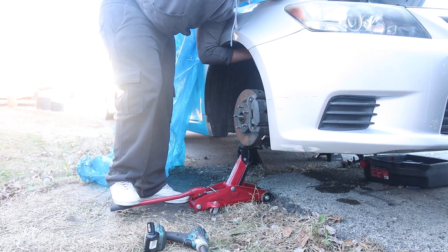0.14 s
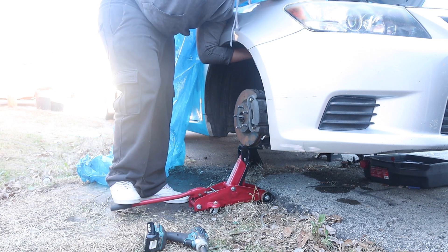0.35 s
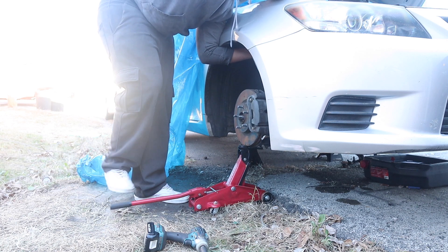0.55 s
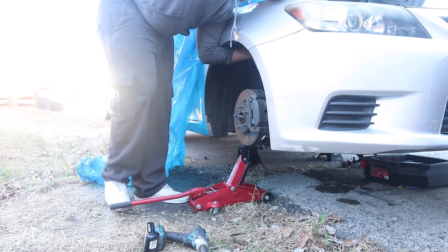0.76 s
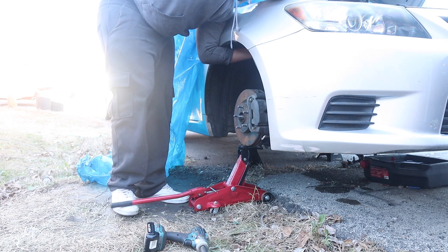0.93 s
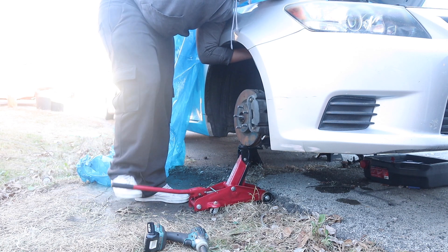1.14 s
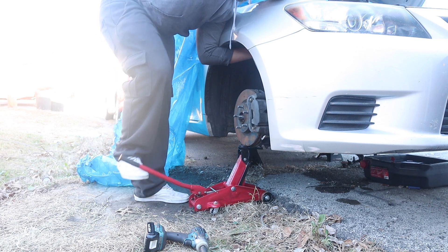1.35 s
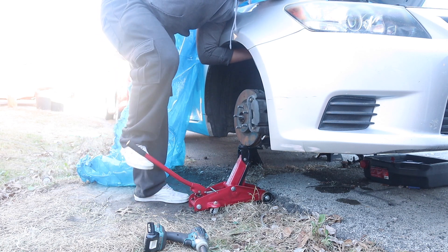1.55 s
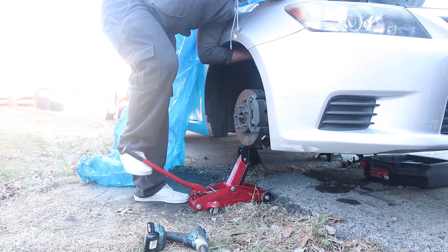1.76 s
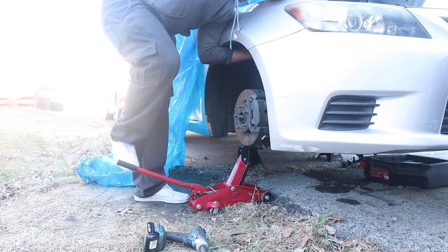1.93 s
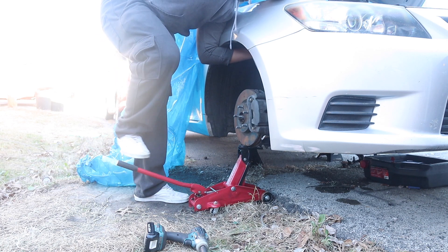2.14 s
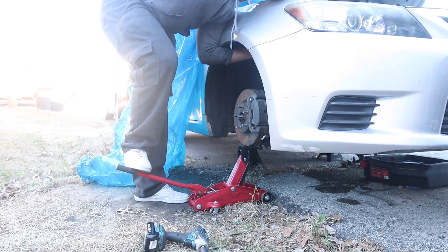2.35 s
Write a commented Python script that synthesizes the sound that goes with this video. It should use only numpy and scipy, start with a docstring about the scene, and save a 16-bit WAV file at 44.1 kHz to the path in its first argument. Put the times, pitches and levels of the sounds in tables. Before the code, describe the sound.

Floor jack worked by foot beside a car: hollow thump, steel clinks, dull knocks, gritty scuffs

```python
"""Floor jack on gravel

A jack is worked by foot beside a car, to the left: struck modes give the body's one hollow thump, the steel
handle's clinks and the shoe's dull knocks; decaying noise bands rustle, and random impulses make grit scuff.
Behind them, wavering narrow-band tones are faint birds, and shaped noise is far traffic and recorder hiss."""
import sys
import numpy as np
from scipy import signal
from scipy.io import wavfile

SR = 44100
rng = np.random.default_rng(int(sys.argv[2]) if len(sys.argv) > 2 else 0)


def dump_mix(stems):
    """Bounce the given channels to the path in sys.argv[1] as a 16-bit WAV at rate SR."""
    frames = np.atleast_2d(stems).T  # one column per channel
    limited = np.clip(frames, -1, 1)  # hard clip at full scale
    pcm = np.round(limited * 32767).astype(np.int16)
    wavfile.write(sys.argv[1], SR, pcm)


N = 110250


def amp(db):
    """Decibel law: level in dB to amplitude gain."""
    return 10 ** (np.asarray(db) / 20)


def rms_one(x):
    """Normalisation: scale to an rms of 1."""
    return x / np.sqrt(np.mean(x ** 2) + 1e-20)


def at_hz(points, hz, column=1):
    """Spectral interpolation: read a table column on a log-frequency axis."""
    points = np.array(points)
    return np.interp(np.log(hz), np.log(points[:, 0]), points[:, column])


def drift(rate_hz):
    """Low-passed random fluctuation: two equal poles at rate_hz, computed every 40 samples, near rms 1."""
    r = np.exp(-2 * np.pi * rate_hz * 40 / SR)
    white = rng.standard_normal(N // 40 + 2002)
    slow = signal.lfilter([1], [1, -2 * r, r * r], white)[2000:]  # skip the filter's start
    return np.interp(np.arange(N) / 40, np.arange(len(slow)), rms_one(slow))


def band(x, low_hz, high_hz):
    """Band-pass filtering with Butterworth slopes."""
    edges = [low_hz, min(high_hz, .45 * SR)]
    return signal.sosfilt(signal.butter(2, edges, "band", fs=SR, output="sos"), x)


def bands():
    """Third-octave analysis: band edges [Hz] from 22 Hz up."""
    edges = 22 * 2 ** (np.arange(30) / 3)
    return list(zip(edges, edges[1:]))


def ring(clicks, hz, t60):
    """Damped resonance: a unit click starts a decaying sine of initial height 1."""
    r = amp(-60 / (t60 * SR))
    w = 2 * np.pi * hz / SR
    return signal.lfilter([0, np.sin(w)], [1, -2 * r * np.cos(w), r * r], clicks + 1e-18)


def add(out, s, sound):
    """Superposition: mix a sound in at time s [s], trimmed to the scene."""
    i = int(s * SR)
    part = sound[max(-i, 0):N - i]
    out[max(i, 0):max(i, 0) + len(part)] += part


# quick run of contacts in the jolt: (time [s], strength before softening [dB])
JOLT_CONTACTS = [(0.2017, -29.5), (0.2033, -19), (0.2059, -20.5), (.209, -22.5), (0.2118, -19),
                 (0.2157, -24), (.221, -32), (0.227, -47), (0.243, -51.5), (0.257, -48), (0.318, -43.5)]
# modes of car body and frame: (frequency [Hz], relative level [dB], decay t60 [s])
BODY_MODES = [(163, -38, 0.17), (222.3, 0, 0.072), (288.8, -8, 0.078), (352.3, -16, 0.12),
              (425.2, -6.5, 0.075), (474, -2, 0.033), (566, -10.5, 0.02), (601, -27.5, 0.045),
              (754, -16, 0.061), (925, -14, 0.04), (1090, -18, 0.027), (1149, -13.5, 0.036),
              (1400, -23, 0.032), (1530, -21.5, 0.037), (1873, -19, 0.046)]
CONTACT_SOFT_HZ, BODY_LOW_CUT_HZ = 2500, 95


def thump():
    """Modal excitation: low-passed contact impulses set the damped modes of the car body ringing."""
    clicks = np.zeros(N)
    for s, db in JOLT_CONTACTS:
        clicks[int(s * SR)] = amp(db)
    r = np.exp(-2 * np.pi * CONTACT_SOFT_HZ / SR)
    clicks = signal.lfilter([1 - r], [1, -r], clicks)
    out = np.zeros(N)
    for k, (hz, db, t60) in enumerate(BODY_MODES):
        sign = (-1) ** k  # neighbouring modes in opposite phase
        out += sign * amp(db) * ring(clicks, hz, t60)
    return signal.lfilter(*signal.butter(2, BODY_LOW_CUT_HZ, "high", fs=SR), out)


# panel rustle after the jolt: (frequency [Hz], relative band level [dB], decay t60 [s])
RUSTLE = [(127, -8, 0.38), (246, -1, 0.3), (403, -1.5, 0.27), (790, -2.5, 0.13), (1220, -1.5, 0.13),
          (2400, -11.5, 0.14), (3860, -5.5, 0.075), (4800, -22, 0.12), (13000, -40, .1)]
RUSTLE_START_S, RUSTLE_RISE_S, RUSTLE_DB = .202, 0.0017, -36.5  # rise is a time constant
LINGER_DB, LINGER_T60_S = -27.5, 1  # weaker slow decay, relative to the main one
LUMP_DB, LUMP_RATE_HZ = 1.5, 60


def rustle():
    """Frequency-dependent damping: each noise band swells quickly, then dies at two rates."""
    t = np.maximum(np.arange(N) / SR - RUSTLE_START_S, 0)
    white = rng.standard_normal((2, N))
    lumps = [amp(LUMP_DB * drift(LUMP_RATE_HZ)) for _ in white]
    rise = 1 - np.exp(-t / RUSTLE_RISE_S)
    out = np.zeros(N)
    for k, (low, high) in enumerate(bands()[7:]):
        hz = np.sqrt(low * high)
        start_db = RUSTLE_DB + at_hz(RUSTLE, hz)
        fall = amp(start_db - 60 * t / at_hz(RUSTLE, hz, column=2))
        fall = fall + amp(start_db + LINGER_DB - 60 * t / LINGER_T60_S)
        noise = rms_one(band(band(white[k % 2], low, high), low, high))
        out += noise * fall * lumps[k % 2] * rise
    return signal.lfilter(*signal.butter(2, BODY_LOW_CUT_HZ, "high", fs=SR), out)


# handle clinks in its socket: (time [s], ring level [dB], crack level before its rise [dB],
# longest t60 left by the grip [s], added level of upper modes [dB], crack top [Hz])
CLINKS = [(0.256, -94, -57, .03, -19, 15000), (0.268, -94, -60.5, .03, -20, 15000),
          (0.328, -84, -61, .03, -18, 4560), (0.367, -74, -62.5, 0.028, -20, 8600),
          (.936, -90, -63, .03, -20, 15000), (1.0026, -37.5, -46.5, .3, 2.5, 13900),
          (1.1047, -62.5, -59.5, 0.099, 4, 4450), (1.1351, -59.5, -60, .05, -2, 9000),
          (1.209, -76, -61, .05, -20, 3500), (1.4955, -81, -76, .04, -32, 3500),
          (1.712, -83, -66, .04, -20, 3480), (1.769, -64.5, -73, 0.061, -17, 4200),
          (1.7991, -59, -78, 0.055, -22, 5000), (1.8116, -57.5, -52, 0.028, -22, 4200),
          (1.824, -53, -63, .12, -12, 4200), (1.8615, -57, -57, .12, -7, 10000),
          (1.8815, -55, -61, .12, -11, 4600), (1.905, -53, -65, .1, -16, 4000),
          (1.917, -49, -57, .05, -12, 4000), (1.9623, -64, -61.5, 0.024, -20, 4200)]
# modes of the steel handle: (frequency [Hz], relative level [dB], decay t60 [s])
HANDLE_MODES = [(1880, -14, .05), (1925, -14, .09), (2730, -16, .05), (3250, -3, .025), (3490, -1, .06),
                (3542, -19, .25), (3800, -8, .03), (4091, -7, .045), (5612, -12, .23), (5623, -14, .2),
                (8010, -17, .08), (8045, -18, .08), (8600, -13, .025), (10840, -24, .05),
                (13200, -18, .025)]
UPPER_FROM_HZ = 5000
CRACK_T60_S, CRACK_LOW_HZ, CRACK_RISE_S = 0.045, 1240, 0.0011  # rise is a time constant


def clinks():
    """Impact on a damped bar: modes ring with varying strengths, and a short noise crack joins them."""
    out, t = np.zeros(N), np.arange(SR // 4) / SR
    hz, level_db, t60 = np.transpose(HANDLE_MODES)[:, :, None]
    chance_db = rng.normal(0, .7, (len(CLINKS), len(HANDLE_MODES), 1))
    noise = rng.standard_normal((len(CLINKS), len(t)))
    rise = 1 - np.exp(-t / CRACK_RISE_S)
    for (s, db, crack_db, longest, upper_db, top_hz), own_db, white in zip(CLINKS, chance_db, noise):
        start_db = db + level_db + own_db + upper_db * (hz > UPPER_FROM_HZ)
        tones = amp(start_db - 60 * t / np.minimum(t60, longest)) * np.sin(2 * np.pi * hz * t)
        dulled = signal.sosfilt(signal.butter(6, top_hz, fs=SR, output="sos"), white)
        crack = rms_one(band(dulled, CRACK_LOW_HZ, top_hz))
        crack = crack * amp(crack_db - 60 * t / CRACK_T60_S) * rise
        add(out, s, tones.sum(axis=0) + crack)
    return out


# shoe knocks on handle and frame: (time [s], low ring level [dB], low ring [Hz], t60 of both rings [s],
# upper ring [Hz], upper ring relative level [dB], tick relative level [dB])
KNOCKS = [(0.371, -65, 2900, 0.046, 4550, -1, -20), (0.922, -53.5, 410, 0.044, 1530, -22, -7),
          (.956, -60.5, 305, 0.028, 945, -8, -8), (.963, -47, 394, 0.03, 864, -16, -12.5),
          (1.003, -57, 698, 0.087, 1100, -11, -21), (1.208, -61.5, 300, 0.03, 650, 1, -10),
          (1.495, -55, 457, 0.07, 678, 1.5, -7), (1.497, -62.5, 1950, .05, 2700, -4, -15),
          (1.516, -50.5, 497, 0.088, 725, -8.5, -31), (1.593, -54.5, 450, 0.034, 735, -1, -13.5),
          (1.699, -76.5, 595, 0.036, 1230, 15.5, -12), (1.705, -66.5, 2750, 0.05, 3650, -4, -15),
          (1.773, -50, 188, 0.061, 452, -14, -25), (1.829, -52, 480, 0.12, 711, -6.5, -10),
          (1.897, -57.5, 605, 0.031, 1230, 2.5, 5.5), (1.915, -49.5, 478, 0.092, 700, -2.5, -12.5),
          (1.918, -49, 585, 0.084, 1343, -9, -1), (1.957, -56, 465, 0.11, 740, -4, -8),
          (1.966, -53.5, 528, 0.056, 1120, -3, -13), (2.319, -46, 241, 0.033, 446, 1.5, -10.5),
          (2.369, -47, 530, 0.036, 1140, -1.5, -33)]
TICK_T60_S, TICK_LOW_HZ, TICK_HIGH_HZ = 0.043, 396, 2140


def knocks():
    """Two-mode impact response: a pair of damped sines with a decaying band of noise as the tick."""
    out, t = np.zeros(N), np.arange(SR // 5) / SR
    ticks = rms_one(band(rng.standard_normal((len(KNOCKS), len(t))), TICK_LOW_HZ, TICK_HIGH_HZ))
    for (s, db, low_hz, t60, high_hz, high_db, tick_db), tick in zip(KNOCKS, ticks):
        tones = np.sin(2 * np.pi * low_hz * t) + amp(high_db) * np.sin(2 * np.pi * high_hz * t)
        rings = tones * amp(-60 * t / t60)
        tick = tick * amp(tick_db - 60 * t / TICK_T60_S)
        add(out, s, amp(db) * (rings + tick))
    return out


# loudness of the shoe on grit and handle: (time [s], level [dB])
SCUFF_LEVEL = [(0, -85), (.08, -73.5), (.19, -70.5), (.3, -64), (.44, -87), (.5, -92), (.9, -111),
               (0.927, -66.5), (.945, -72.5), (.965, -61.5), (1.0, -63), (1.05, -68), (1.12, -73.5),
               (1.17, -78.5), (1.22, -76), (1.27, -100), (1.66, -81), (1.7, -82), (1.74, -95), (1.8, -74),
               (1.9, -61), (1.925, -74), (1.95, -79), (2.0, -84), (2.07, -78), (2.1, -72), (2.2, -73),
               (2.28, -66.5), (2.34, -70), (2.42, -74), (2.5, -107)]
# colour of the grit: (frequency [Hz], relative band gain [dB])
SCUFF_COLOUR = [(300, 3.5), (700, 2), (1500, -3.5), (2500, -1), (3700, -4.5), (4300, -6.5), (5000, -13),
                (8000, -19), (15000, -27)]
GRAINS_PER_S, GRAIN_SPREAD_DB = 8000, 3.5
SCUFF_RING_DB = -13  # the rubbed handle rings faintly, relative to the grit


def scuff():
    """Granular friction: dense random impulses of uneven size, coloured as grit and ringing the handle."""
    sizes = amp(GRAIN_SPREAD_DB * np.minimum(rng.exponential(1, N), 5)) * rng.choice([-1, 1], N)
    grains = sizes * (rng.random(N) < GRAINS_PER_S / SR) + 1e-18
    grit, rings = np.zeros(N), np.zeros(N)
    for low, high in bands()[11:]:
        gain = amp(at_hz(SCUFF_COLOUR, np.sqrt(low * high)))
        grit += gain * band(band(grains, low, high), low, high)
    for hz, db, t60 in HANDLE_MODES:
        if hz < UPPER_FROM_HZ:
            rings += amp(db) * ring(grains, hz, t60)
    out = rms_one(grit) + amp(SCUFF_RING_DB) * rms_one(rings)
    return rms_one(out) * amp(np.interp(np.arange(N) / SR, *np.transpose(SCUFF_LEVEL)))


# echoes from car and ground: (delay [s], left level [dB], right level [dB])
ECHOES = [(.0031, -12.5, -18), (.0074, -26, -27), (0.0111, -30, -28), (.022, -20.5, -28.5)]
ECHO_CUT_HZ = 1300
SHADOW_HZ, SHADOW_DB = 300, -11.5  # shelf corner and treble loss on the right


def place(x):
    """Acoustic shadow and reflection: direct at left, treble-shelved at right, then dull echoes."""
    low = signal.lfilter(*signal.butter(1, SHADOW_HZ, fs=SR), x)
    out = np.array([x, low + amp(SHADOW_DB) * (x - low)])
    dull = signal.lfilter(*signal.butter(1, ECHO_CUT_HZ, fs=SR), x)
    for s, left_db, right_db in ECHOES:
        add(out[0], s, amp(left_db) * dull)
        add(out[1], s, amp(right_db) * dull)
    return out


CALL_EDGE = 0.2  # share of a call spent swelling and fading


def blurred_tone(hz, width_hz):
    """Narrow-band modulation: a pitch curve blurred by distance into a wavering band."""
    low = signal.butter(2, width_hz / 2, fs=SR)
    a, b = signal.lfilter(*low, rng.standard_normal((2, len(hz) + 2000)))[:, 2000:]
    phase = 2 * np.pi * np.cumsum(hz) / SR
    tone = rms_one(a * np.sin(phase) + b * np.cos(phase))
    return tone * signal.windows.tukey(len(hz), CALL_EDGE)


# far whistling bird: (time [s], length [s], pitch [Hz], rms level before edges and panning [dB], width [Hz])
WHISTLES = [(.38, .13, 2700, -82, 400), (.45, 0.13, 1990, -88, 62.5), (.56, .09, 2510, -82, 110),
            (.64, 0.078, 2950, -81.5, 400), (.67, 0.11, 2750, -82, 398), (.72, 0.092, 1990, -87, 60),
            (.83, 0.099, 2525, -82, 110), (1.12, 0.061, 2550, -80.5, 60), (1.22, 0.14, 2700, -81.5, 396),
            (1.28, 0.052, 1964, -84, 60)]


def whistles():
    """Steady pitch: each whistle is a narrow band around one constant frequency."""
    out = np.zeros(N)
    for s, length, hz, db, width_hz in WHISTLES:
        add(out, s, amp(db) * blurred_tone(np.full(int(length * SR), hz), width_hz))
    return out


# far hoarse calls: (time [s], length [s], top pitch [Hz], rms level before edges and panning [dB])
HOARSE_CALLS = [(-.08, .25, 1494, -76.5), (0.55, 0.22, 1391, -78.5), (1.043, 0.25, 1402, -80.5),
                (2.03, 0.46, 1463, -80.5)]
CALL_WIDTH_HZ, CALL_SAG_HZ = 187, 208.4


def hoarse_calls():
    """Frequency glide: a wide-band tone whose pitch arches up and then sags along a parabola."""
    out = np.zeros(N)
    for s, length, hz, db in HOARSE_CALLS:
        u = np.linspace(-.6, 1, int(length * SR))  # the pitch peaks at u = 0
        add(out, s, amp(db) * blurred_tone(hz - CALL_SAG_HZ * u ** 2, CALL_WIDTH_HZ))
    return out


# spectrum of traffic and hiss: (frequency [Hz], relative density [dB per Hz])
AIR_SPECTRUM = [(22, -23), (35, -24), (62, 0.5), (90, -5.5), (130, 1), (180, -7), (300, -18), (500, -17.5),
                (800, -23), (1400, -29), (2000, -31.5), (3500, -32), (5000, -34.5), (15500, -36.5)]
# likeness of the two channels: (frequency [Hz], correlation [0-1])
LIKENESS = [(60, 1), (180, 0.9), (550, 0.77), (1650, 0.59), (4970, 0.056), (15000, 0.08)]
# lean of the noise: (frequency [Hz], left over right [dB])
LEAN = [(60, -2), (180, 0.5), (550, 7), (1650, 6.5), (4970, 1.5), (15000, -1)]
AIR_DB, AIR_FLICKER_DB = -63, .7  # overall rms; spread of each drift up to 400 Hz, less above


def air():
    """Partial coherence: noise bands for traffic and hiss, mixed from mid and side, flicker in level."""
    out, together, white = 0, drift(0.5), rng.standard_normal((2, 2, N))
    for k, (low, high) in enumerate(bands()):
        mid, side = band(white[k % 2], low, high)
        hz = np.sqrt(low * high)
        alike = np.clip(at_hz(LIKENESS, hz), 0, 1)
        flicker_db = AIR_FLICKER_DB * min(1, 400 / hz) * (together + drift(10))
        lean_db = at_hz(LEAN, hz) * np.array([[.5], [-.5]])
        gain = amp(at_hz(AIR_SPECTRUM, hz) + flicker_db + lean_db)
        out = out + gain * (np.sqrt(1 + alike) * mid + np.sqrt(1 - alike) * side * [[1], [-1]])
    return amp(AIR_DB) * rms_one(out)


def scene():
    """Superposition: the jack on the left, birds leaning left by level difference, and air around."""
    jack = place(thump() + rustle() + clinks() + knocks() + scuff())
    birds = (whistles() + hoarse_calls()) * amp([[2.5], [-2.5]])  # left and right [dB]
    return jack + birds + air()


def record(dry):
    """Band limitation: a steep low-pass takes everything above 15.8 kHz down by at least 60 dB."""
    return signal.sosfilt(signal.cheby2(24, 60, 15800, fs=SR, output="sos"), dry)


dry = scene()
out = record(dry)
dump_mix(out)
```